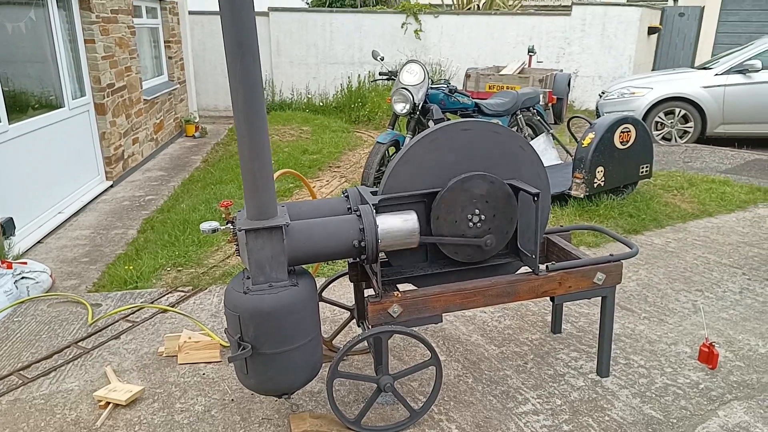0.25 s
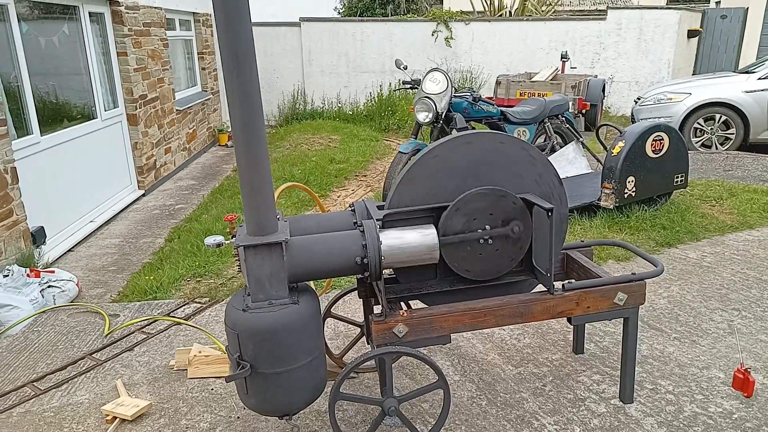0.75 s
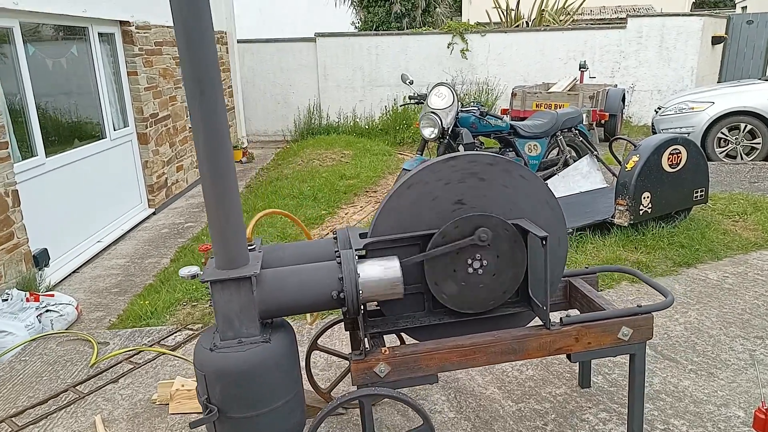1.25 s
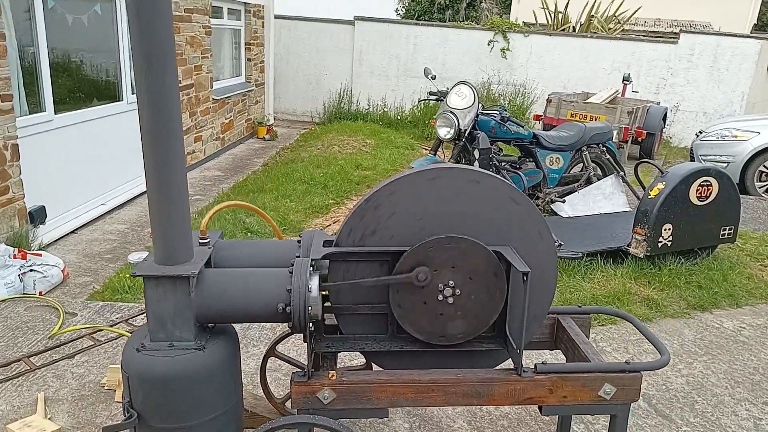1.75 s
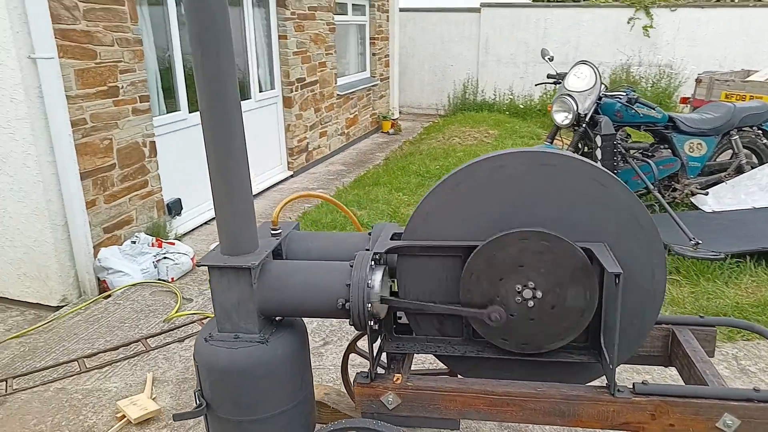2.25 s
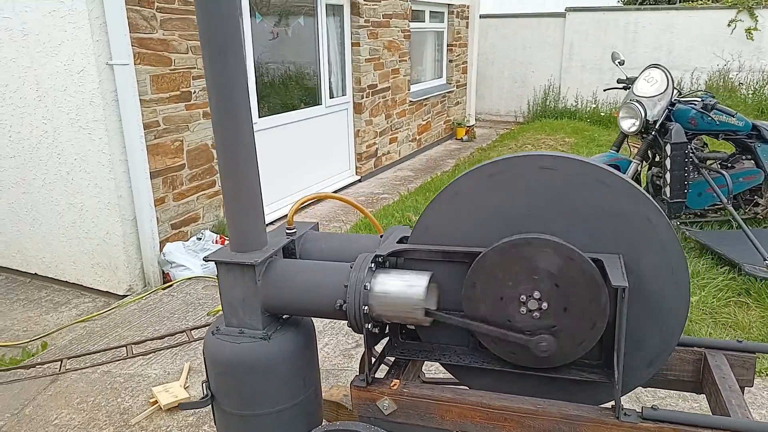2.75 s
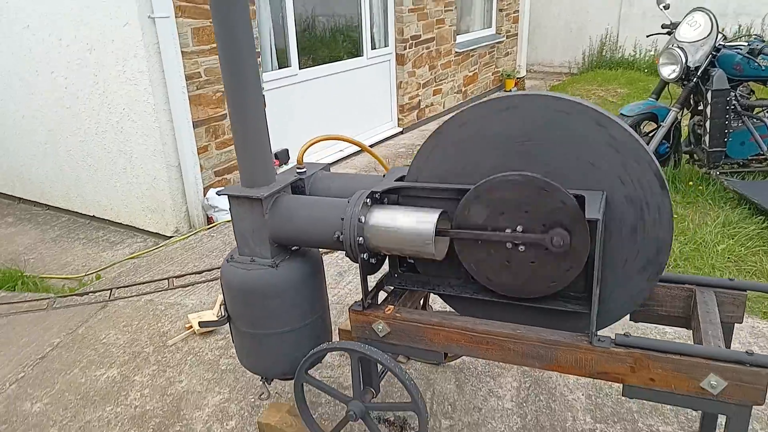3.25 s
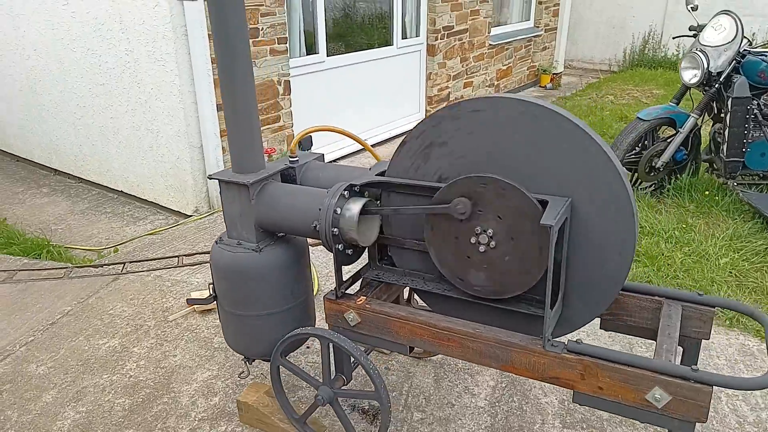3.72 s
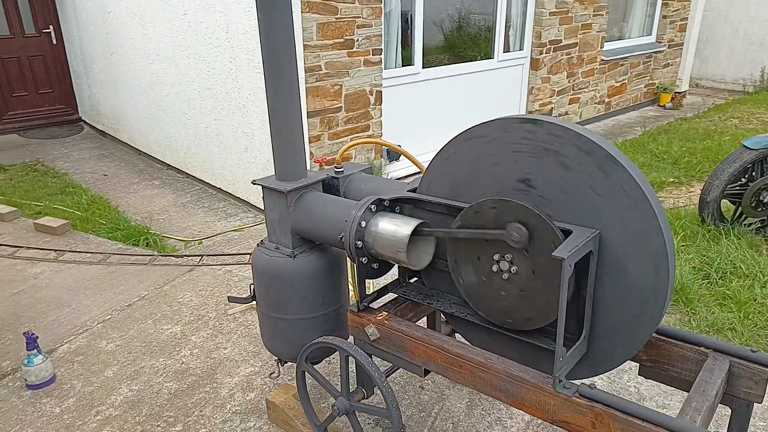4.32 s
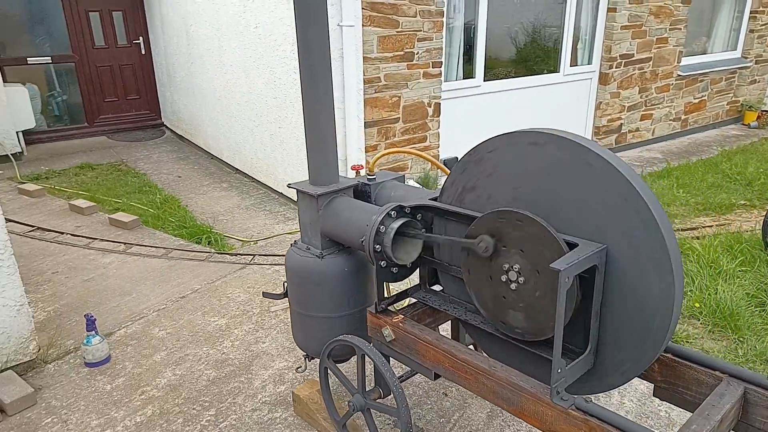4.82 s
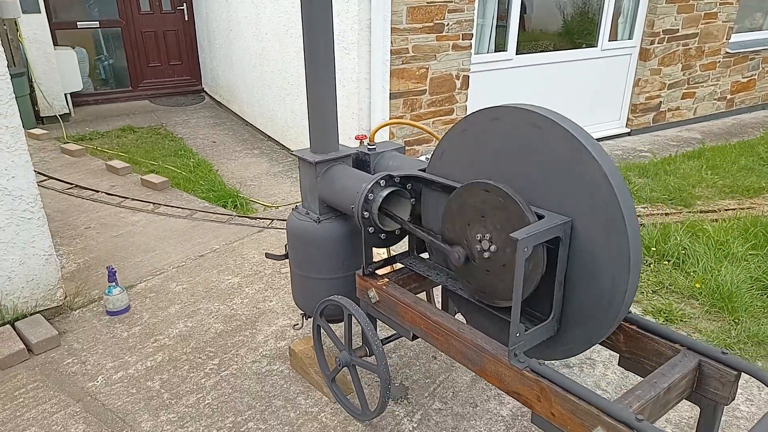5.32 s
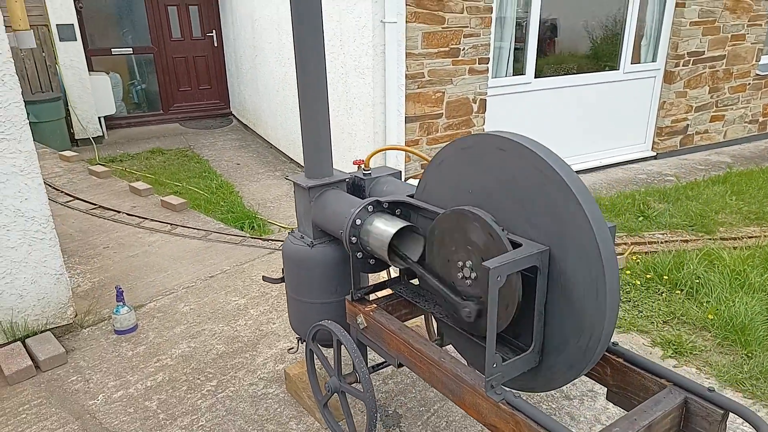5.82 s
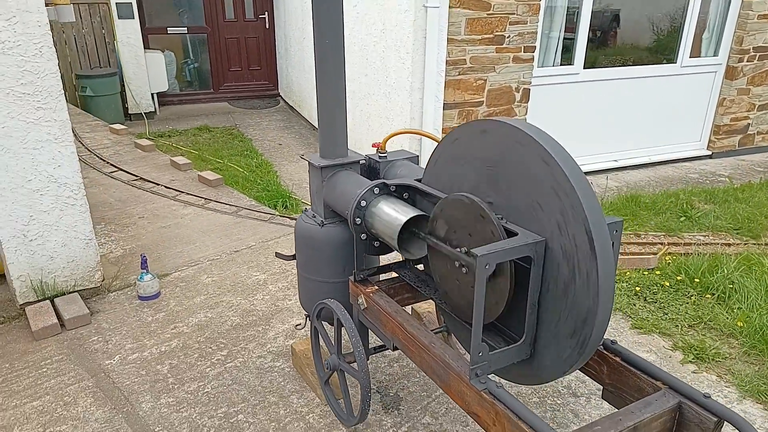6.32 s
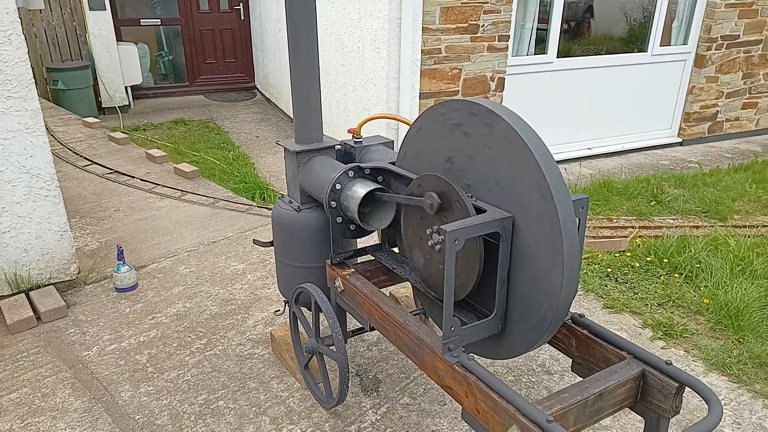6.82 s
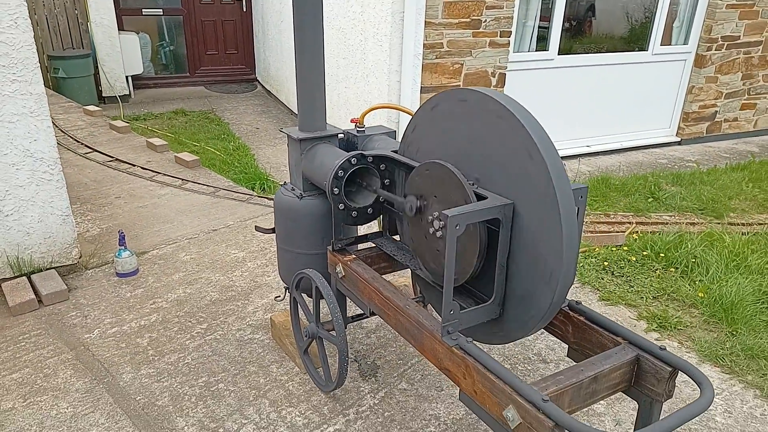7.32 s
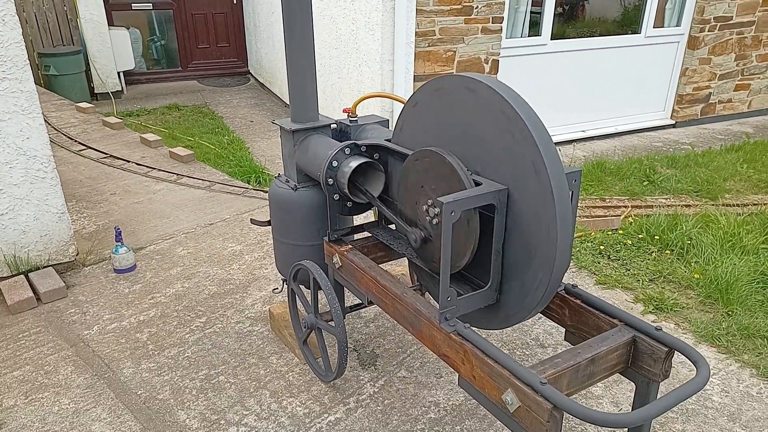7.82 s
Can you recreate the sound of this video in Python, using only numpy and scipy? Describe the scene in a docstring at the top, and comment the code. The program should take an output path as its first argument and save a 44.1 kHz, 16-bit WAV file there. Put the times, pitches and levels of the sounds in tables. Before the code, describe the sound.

A hot-air engine runs outdoors with a steady beat of soft thumps, ticks and sharp metal clacks over faint rubbing.

```python
"""First comes a soft thump, then a tick and a sharp clack, repeating about 3.6 times a second.
It is a home-built hot-air engine in a paved yard, heard from a microphone that circles it.
On each turn a quick run of knocks shakes the frame, a link ticks, the loose crank pin strikes
and bounces back, and sliding metal squeals faintly. The seals rub all the time, the walls
echo and wind stirs the microphone."""
import sys
import numpy as np
from scipy import signal
from scipy.fft import rfft, irfft, next_fast_len
from scipy.io import wavfile
from scipy.ndimage import uniform_filter1d, map_coordinates

SR = 44100
rng = np.random.default_rng(int(sys.argv[2]) if len(sys.argv) > 2 else 0)


def to_wav(sig):
    """Store sig (one row per channel, or 1-D mono) as 16-bit WAV at the path in sys.argv[1].

    Samples outside -1..1 are clipped; the rate is SR.
    """
    pcm = np.clip(np.atleast_2d(sig), -1, 1) * 32767
    pcm = np.round(pcm).astype(np.int16)
    wavfile.write(sys.argv[1], SR, pcm.T)  # frames by channels


N = 355446
SPAN, LEAD = 8192, 1323  # samples in one short sound, and how many come before its hit
T = (np.arange(SPAN) - LEAD) / SR
HZ = np.fft.rfftfreq(SPAN, 1 / SR)


def amp(db):
    return 10 ** (np.asarray(db) / 20)


def unit(x):
    return x / np.sqrt(np.mean(np.abs(x) ** 2) + 1e-20)


def bump(x, centre, width):
    return np.exp(-((x - centre) / width) ** 2)


def at_pitch(rows, hz):
    """Reads a table between its pitches, on a log scale."""
    pitches, values = np.transpose(rows)
    return np.interp(np.log(hz + 1), np.log(pitches + 1), values)


def at_time(rows, s):
    """Reads every column of a table at one moment."""
    times, *columns = np.transpose(rows)
    return np.array([np.interp(s, times, c) for c in columns])


def curve(rows):
    """One table value per sample."""
    return np.interp(np.arange(N) / SR, *np.transpose(rows))


def wobble(rate, size=N):
    """A smooth curve through `rate` random points a second."""
    points = rng.standard_normal(int(size * rate / SR) + 4)
    return map_coordinates(points, [np.arange(size) * rate / SR])


def burst(at, rise, fade):
    """Swells to 1 at a moment, then drops 60 dB in `fade` seconds."""
    return np.where(T < at, bump(T, at, rise), amp(-60 * np.maximum(T - at, 0) / fade))


def grit(envelope, rough_db):
    """A force made of many small, uneven touches."""
    return envelope * rng.standard_normal(SPAN) * unit(amp(rough_db * wobble(414.7, SPAN)))


def ring(force, notes, scatter_db):
    """A struck part rings at its own notes, their strengths scattered anew for each blow."""
    gains = amp(scatter_db * rng.standard_normal(len(notes)))
    body = sum((-1) ** k * gains[k] * amp(db) * 1j * HZ * width / (hz**2 - HZ**2 + 1j * HZ * width)
               for k, (hz, width, db) in enumerate(notes))
    # a part gives off little sound outside the range of its notes
    above, below = 1j * HZ / (0.93 * notes[-1][0]), 1j * HZ / (0.5 * notes[0][0])
    body *= below ** 2 / (1 + below + below ** 2) / (1 + above + above ** 2)
    return irfft(rfft(force) * unit(body), SPAN)


def level(x, db, seconds):
    """Sets the average level of the first moments after the hit."""
    return amp(db) * x / np.sqrt(np.mean(x[LEAD:LEAD + int(seconds * SR)] ** 2))


def add(track, s, x):
    """Lays a sound on the padded track."""
    track[SPAN + round(s * SR) - LEAD:][:SPAN] += x


def noise(tone, patchy_db):
    """Noise with a given tone and random louder and softer patches."""
    hz, _, bands = signal.stft(rng.standard_normal(N + 1024), SR, nperseg=1024)
    patches = uniform_filter1d(uniform_filter1d(rng.standard_normal(bands.shape), 5, 0), 5, 1)
    bands *= amp(patchy_db * unit(patches) + at_pitch(tone, hz)[:, None])
    return unit(signal.istft(bands, nperseg=1024)[1][:N])


# Notes that each part rings at; wider ones die sooner: (pitch [Hz], width [Hz], level [dB])
BOOM_NOTES = [(232.1, 17.5, -6), (292.1, 16.4, -9), (350.4, 56.6, -6), (370.7, 62, -9)]  # the frame's deep boom
LEG_NOTES = [(137, 8.3, 0)]
FRAME_NOTES = [(400, 54, -3), (481, 31, -2.5), (553, 28, 2), (612.5, 50, 2.5), (730, 150, -4.5)]
CRADLE_NOTES = [(888, 113, 4.6), (998, 35, 10.4), (1068, 205, 4.3)]
ROD_NOTES = [(1250, 25.5, 0.5), (1383, 109, -3.5), (1447.5, 59, 3.5)]
# The knocks in one thump: (delay [s], level [dB])
KNOCK_RUN = [(0, -4.5), (.009, 0.5), (.022, 4), (0.032, -9.5), (0.04, -17), (0.055, -22.5)]
# How the run is heard as the microphone moves: (time [s], first knock [dB], late knocks [dB])
KNOCK_BOOST = [(0, -1.5, 9), (1.8, -1, 10.5), (2.4, 8.5, 6), (4.2, 11, 6), (5.5, 1, 9), (8.06, 0.5, 15)]
# How loud the parts are in a thump: (time [s], boom [dB], frame [dB], cradle [dB], rod [dB])
THUMP_LEVELS = [(0, -45.5, -46.5, -69, -51.5), (0.8, -44.5, -57.5, -59.5, -52.5),
                (1.8, -41.5, -45.5, -62.5, -49), (2.6, -37, -39.5, -45.5, -45.5),
                (3.1, -40, -41.5, -56, -53.5), (4.1, -38, -44, -65, -59), (5, -39.5, -46, -53.5, -62),
                (6, -39.5, -49.5, -62, -57.5), (7.1, -40, -51, -60.5, -58.5), (7.8, -40.5, -49, -57, -57)]


def thumps(track):
    """Nearly the same run of soft knocks shakes the frame, legs, cradle and rod on every turn."""
    first_s, turn_s, slowing_s = -.0425, .27736, 6.63e-5
    turn = np.arange(30)
    for s in first_s + turn_s * turn + slowing_s * turn ** 2:
        first_db, late_db = at_time(KNOCK_BOOST, s)
        boom_db, *parts_db = at_time(THUMP_LEVELS, s)
        force = grit(.004 * burst(.02, .012, .12), rough_db=2.5)
        for delay, db in KNOCK_RUN:
            sample = LEAD + round((delay + rng.normal(0, .0004)) * SR)
            force[sample] += amp(db + rng.normal(0, 0.99))
        force[T < .005] *= amp(first_db)
        force[T > .027] *= amp(late_db)
        force = signal.lfilter(np.hanning(26), 1, force)  # padding softens the knocks
        sound = level(ring(force, BOOM_NOTES, scatter_db=1.5), boom_db, .06)
        sound += level(ring(force, LEG_NOTES, scatter_db=1.5), boom_db - 23.5, .06)
        # shaken through their mounts, these parts answer only near their own notes
        for notes, db in zip((FRAME_NOTES, CRADLE_NOTES[:1], ROD_NOTES[1:2]), parts_db):
            shaking = ring(force, notes, scatter_db=0)
            sound += level(ring(shaking, notes, scatter_db=1.5), db, .06)
        add(track, s, sound)


# The tone of the rub, murmur and hiss: (pitch [Hz], level [dB])
RUB_TONE = [(650, -46), (1100, -2.5), (1330, -3.5), (1820, -3), (2330, -3.5), (2580, -5), (3770, 0),
            (4410, -5.5), (5460, -17), (6530, -8.5), (7550, -31), (16000, -51)]
MURMUR_TONE = [(90, -27), (140, -7.5), (225, 0), (300, 2.5), (430, 1), (600, -3.5), (760, -6.5), (1000, -7),
               (1500, -46.5)]
HISS_TONE = [(5000, -38), (7500, 1), (9500, -2), (12500, -12), (15000, -2), (16000, -5)]
# How loud each is, before its dips: (time [s], level [dB])
RUB_LEVELS = [(0, -52), (1.2, -53.5), (2.5, -47.5), (3, -51), (4.6, -51.5), (5, -45), (5.3, -52.5),
              (6.3, -52.5), (7, -49), (8.06, -53)]
MURMUR_LEVELS = [(0, -58), (1.3, -53), (2.6, -54), (3.2, -51.5), (4.5, -55), (5.5, -56.5), (6.3, -56),
                 (8.06, -61)]
HISS_LEVELS = [(0, -84), (1.5, -86), (2.6, -69), (5, -72.5), (8.06, -73.5)]


def seals(clack_times):
    """The seals rub and hiss and the frame murmurs; all dip where the piston turns round."""
    starts = [clack_times[0] - .279, *clack_times, clack_times[-1] + .28]
    turn = np.interp(np.arange(N) / SR, starts, np.arange(len(starts))) % 1  # 0 to 1 between clacks
    rest, second_rest = bump(turn, .34, .062), bump(turn, .65, .23)
    rub_db = curve(RUB_LEVELS) - 8 * rest - 1.8 * second_rest
    rub = amp(rub_db + 1.25 * wobble(15)) * noise(RUB_TONE, patchy_db=7)
    murmur_db = curve(MURMUR_LEVELS) - 3.67 * rest - 2.2 * second_rest - 3.4 * bump(turn, .9, .044)
    murmur = amp(murmur_db + 4.68 * wobble(10)) * noise(MURMUR_TONE, patchy_db=4.5)
    hiss_db = curve(HISS_LEVELS) - 13.5 * bump(turn, .54, .14)
    hiss = amp(hiss_db + 1.7 * wobble(22)) * noise(HISS_TONE, patchy_db=0)
    return rub + murmur + hiss


# The wind's low rumble: (pitch [Hz], level [dB])
WIND_TONE = [(20, -25), (40, -32), (60, 1), (85, 14.5), (140, 13), (250, -67)]
# The light breeze: (time [s], level [dB])
BREEZE_LEVELS = [(0, -70), (1, -73), (2, -69.5), (4.5, -76), (5.8, -66), (6.3, -78), (7, -65), (7.4, -67),
                 (8.06, -51.5)]
# Single gusts: (loudest time [s], level [dB], swell time [s])
WIND_GUSTS = [(0.309, -63, .04), (2.107, -50, 0.021), (2.224, -43.5, 0.043), (2.366, -56, .03),
              (2.786, -60, 0.031), (3.076, -53, 0.048), (3.617, -65, .03), (4.186, -46, .035),
              (5.049, -61, 0.033), (5.723, -64, 0.026), (5.858, -62, .03), (6.721, -63, 0.036),
              (6.927, -58.5, 0.15)]


def wind():
    """Short gusts and a light breeze rumble on the microphone."""
    rumble = noise(WIND_TONE, patchy_db=9)
    even_rumble = rumble / np.sqrt(np.abs(uniform_filter1d(rumble ** 2, size=SR // 16)) + 0.14)
    t = np.arange(N) / SR
    gusts = sum(amp(db) * bump(t, s, swell) for s, db, swell in WIND_GUSTS)
    breeze = amp(curve(BREEZE_LEVELS) + 3.5 * wobble(6.8))
    return (gusts + breeze) * amp(0.6 * wobble(12)) * even_rumble


# Higher ringing notes: (pitch [Hz], width [Hz], level [dB])
LINK_NOTES = [(2730, 220, -15.5), (3166, 18, -7), (3710, 23, -16), (3783, 93, 5), (4085, 80, -2.5),
              (4400, 60, -1), (4707, 110, -5.5), (4674, 164, -9)]
DISC_NOTES = [(1962, 48, -10), (2093, 34, -8.5), (2180, 120, -6.5), (2307, 52, 2.5), (2477, 54, -7.5)]
COLLAR_NOTES = [(5390, 84, -4), (6110, 100, 3.5), (6450, 74, 7), (6786, 220, 3.5), (7120, 56, -6.5),
                (7540, 110, -4)]
SIZZLE_NOTES = [(7900, 230, -7), (8430, 370, 21), (8440, 340, 27), (9120, 400, 21), (9670, 360, 11),
                (10170, 270, 7)]  # bright ring of the small parts
# very high fizz on each tick and clack, coloured by the microphone's resonance near 15 kHz
FIZZ_NOTES = [(10900, 730, -15.5), (12400, 890, -11.5), (14540, 900, -11), (14900, 600, 2.5)]
COLLAR_FOLLOWS = 0.52  # share of the sizzle level added to the collar's
# How loud the parts are in a tick: (time [s], rod [dB], collar before that share [dB])
TICK_LEVELS = [(0, -53, -29.5), (1.6, -54.5, -13.5), (2.8, -55, -34), (4.4, -59.5, -27), (6.2, -50.5, -38),
               (8, -51, -28)]
# Each hit of the link: (time [s], blow [dB], chatter [dB], sizzle [dB])
LINK_HITS = [(0.043, -29.5, -59, -58.5), (0.319, -30.5, -42, -53.5), (0.597, -33, -42.5, -61.5),
             (0.872, -37, -39, -66), (1.15, -37.5, -36.5, -69), (1.431, -37, -43, -71),
             (1.708, -31, -42, -56.5), (1.987, -35, -48, -57), (2.264, -31.5, -42, -51.5),
             (2.548, -31, -35, -48), (2.825, -32.5, -50, -57), (3.101, -32.5, -64, -75),
             (3.381, -40.5, -50, -62.5), (3.659, -35, -40, -57.5), (3.938, -34, -40, -79),
             (4.217, -52, -40, -75), (4.497, -36, -44, -73), (4.778, -45, -55, -68),
             (5.063, -34.5, -38, -54), (5.336, -63, -42, -77), (5.619, -37, -41.5, -60.5),
             (5.897, -35.5, -43.5, -53), (6.187, -40, -42, -55.5), (6.46, -37, -49, -69),
             (6.741, -34.5, -43.5, -54), (7.022, -40.5, -45.5, -65), (7.304, -39, -46, -60),
             (7.585, -41, -57, -66), (7.866, -38.5, -44.5, -63)]


def link_ticks(track):
    """The link hits suddenly and buzzes on, setting other parts ringing."""
    for s, blow_db, chatter_db, sizzle_db in LINK_HITS:
        rod_db, collar_db = at_time(TICK_LEVELS, s)
        blow = amp(blow_db) * burst(0.0015, 0.0026, 0.13)
        chatter = amp(chatter_db) * burst(0.019, 0.017, 0.28) * burst(0.057, 0.89, 0.23)
        sound = ring(grit(blow + chatter, rough_db=3), LINK_NOTES, scatter_db=2)
        heavy = grit(5.4 * blow + chatter, rough_db=-3)
        sound += level(ring(heavy, ROD_NOTES[2:] + DISC_NOTES[3:], scatter_db=9), rod_db, 0.056)
        snap = amp(blow_db) * burst(.001, .0006, .05)  # the small parts answer at once
        light = grit(snap + 0.3 * chatter, rough_db=3)
        highs_db = collar_db + COLLAR_FOLLOWS * sizzle_db, sizzle_db, -55 + .4 * sizzle_db
        for notes, db in zip((COLLAR_NOTES, SIZZLE_NOTES, FIZZ_NOTES), highs_db):
            sound += level(ring(light, notes, scatter_db=5), db, .02)
        add(track, s, sound)


# Ringing notes of the crank pin and piston: (pitch [Hz], width [Hz], level [dB])
PIN_NOTES = [(2739, 68, -11), (2982, 34, -6.5), (3195, 190, -9), (3583, 32.5, -1), (3841, 52, -1.5),
             (4067, 140, -5), (4320, 95, -2.5), (4527, 87, -6.5), (4607, 106, -3.5), (5020, 26, -12.5)]
PISTON_NOTES = [(1588, 75, 0.5), (1696, 105, 2.5), (1740, 340, -1)]
# The heavy parts in a clack: (time [s], frame [dB], cradle [dB], rod [dB], piston [dB], disc [dB])
CLACK_LEVELS = [(0.1, -56, -51, -40.5, -43.5, -48), (0.8, -50.5, -64, -33.5, -65, -41.5),
                (1.6, -47.5, -65, -45, -55, -48), (2.7, -47.5, -47, -38.5, -48, -41),
                (3.4, -51, -47, -44, -61, -43), (4.5, -49.5, -48.5, -43, -38, -45.5),
                (5.4, -45.5, -36, -45.5, -42, -40), (6.6, -48, -49.5, -46.5, -37.5, -38.5),
                (8, -43.5, -46, -47.5, -41, -45.5)]
# The collar in a clack, before its share of the sizzle: (time [s], level [dB])
COLLAR_LEVELS = [(0, -24.5), (1.2, -14.5), (2.2, -20.5), (2.7, -20), (8, -17)]
# Each hit of the pin:
# (time [s], slide [dB], blow [dB], chatter [dB], bounce delay [s], bounce [dB], sizzle [dB])
PIN_HITS = [(0.136, -50, -21.5, -40.5, 0.033, -35.5, -69), (0.415, -44, -21.5, -46, 0.031, -36.5, -68.5),
            (0.693, -43, -19, -36, 0.033, -37, -69.5), (0.977, -22, -26.5, -43, 0.032, -37.5, -78.5),
            (1.248, -51, -15, -33.5, 0.039, -41, -64.5), (1.528, -43, -16.5, -36.5, 0.038, -37.5, -63.5),
            (1.805, -50, -18, -37, 0.035, -33.5, -62.5), (2.082, -35, -22, -39, 0.034, -30.5, -61),
            (2.36, -37.5, -18, -34, 0.033, -31, -54.5), (2.642, -32, -22.5, -51, 0.025, -29, -51.5),
            (2.919, -35, -21, -45, 0.031, -26.5, -54), (3.199, -33, -21, -44, 0.03, -31, -54.5),
            (3.477, -32, -18.5, -39, 0.031, -29, -55.5), (3.757, -36, -24.5, -38.5, 0.034, -32.5, -57.5),
            (4.04, -30.5, -33.5, -64, 0.022, -31, -56.5), (4.323, -33.5, -26.5, -34, 0.03, -35, -58),
            (4.591, -38.5, -23, -36.5, 0.039, -33, -56), (4.873, -33.5, -21.5, -46, 0.028, -26, -60),
            (5.154, -31.5, -20.5, -36.5, 0.033, -31.5, -56), (5.436, -31, -21.5, -35, 0.031, -33.5, -58.5),
            (5.716, -35, -30, -53, 0.022, -29, -57.5), (5.992, -37, -24.5, -39, 0.035, -32.5, -57),
            (6.273, -35, -22, -32.5, 0.033, -30.5, -55), (6.554, -33.5, -20, -33, 0.031, -30.5, -57.5),
            (6.835, -32, -26, -67, 0.027, -27, -58.5), (7.116, -38.5, -23.5, -37, 0.03, -33.5, -61),
            (7.397, -30, -27, -38.5, 0.033, -29.5, -56.5), (7.677, -33.5, -22.5, -36, 0.031, -27.5, -59),
            (7.957, -36.5, -28, -50, 0.03, -30.5, -59)]


def pin_clacks(track):
    """The loose pin slides across its gap, strikes, chatters, bounces and is pressed quiet."""
    heavy_parts = FRAME_NOTES, CRADLE_NOTES, ROD_NOTES, PISTON_NOTES, DISC_NOTES
    for s, slide_db, blow_db, chatter_db, delay, bounce_db, sizzle_db in PIN_HITS:
        parts_db = at_time(CLACK_LEVELS, s) + 3 * rng.standard_normal(5)  # no two turns are alike
        slide = amp(slide_db - 3) * burst(-.008, .009, .05)
        blow = amp(blow_db - 7) * burst(0, 0.0054, 0.051)
        strike = amp(blow_db + 13) * (T == 0)
        bounce = amp(bounce_db) * burst(delay, 0.0086, 0.069)
        chatter = amp(chatter_db) * burst(0.013, 0.0027, 0.15) * burst(delay + 0.014, 0.92, 0.042)
        force = strike + grit(slide + blow + chatter + bounce, rough_db=-1.5)
        sound = ring(force, PIN_NOTES, scatter_db=6)
        # the heavy parts mostly feel the blow, the light ones the sliding
        heavy = 1.15 * strike + grit(0.99 * blow + chatter + 0.19 * bounce, rough_db=1.5)
        heavy += grit(.25 * slide, rough_db=2.5)
        light = grit(3.4 * slide + 0.67 * blow + 0.35 * chatter + 0.88 * bounce, rough_db=3)
        for notes, db in zip(heavy_parts, parts_db):
            sound += level(ring(heavy, notes, scatter_db=5), db, .047)
        sound += level(ring(heavy, BOOM_NOTES[1:], scatter_db=3), parts_db[0] - 10, .047)
        collar_db = at_time(COLLAR_LEVELS, s)[0] + COLLAR_FOLLOWS * sizzle_db
        for notes, db in (COLLAR_NOTES, collar_db), (SIZZLE_NOTES, sizzle_db):
            sound += level(ring(light, notes, scatter_db=4), db, .04)
        # a fine fizz lasts from the slide to the bounce and flares at both
        fizz = 0.54 * burst(-0.0044, 0.0067, 0.21) * burst(delay + 0.0061, 1, 0.075)
        fizz += 1.1 * burst(-.006, .006, 0.051) + burst(delay, .006, 0.053)
        sound += amp(sizzle_db + 0.5) * ring(grit(fizz, rough_db=2.5), FIZZ_NOTES, scatter_db=0.5)
        add(track, s, sound)


# The four notes of sliding metal: (pitch [Hz], width [Hz], loudest time after the clack [s])
SQUEAL_NOTES = [(2413, 48, 0.12), (4434, 70, 0.058), (5970, 25, 0.075), (2876, 27, 0.14)]
# Their relative levels: (time [s], first [dB], second [dB], third [dB], fourth [dB])
SQUEAL_LEVELS = [(0, -71, -68, -79, -86), (1.6, -65, -54, -75, -80), (2.5, -60, -56.5, -57, -73),
                 (3.6, -60, -52, -63, -59), (4.3, -62.5, -55, -55.5, -81), (4.9, -64.5, -59, -66, -72),
                 (5.2, -70, -51, -95, -72), (6.8, -65.5, -56.5, -75, -71), (8.06, -64, -50, -73, -70)]


def squeals(track, clack_times):
    """Between clacks, sliding metal sings a few thin, wavering notes."""
    for s in clack_times:
        for (hz, width, delay), db in zip(SQUEAL_NOTES, at_time(SQUEAL_LEVELS, s)):
            stroke = burst(delay + rng.normal(0, 0.022), 0.031, 0.16)
            rubbing = rng.standard_normal(SPAN)
            note = ring(rubbing, [(hz * (1 + rng.normal(0, 0.0037)), width, 0)], scatter_db=0)
            add(track, s, amp(db + 11.5 + rng.normal(0, 2.5)) * stroke * note)


# How long the yard echoes: (pitch [Hz], time to fade by 60 dB [s])
ECHO_TIMES = [(200, 0.56), (2000, 0.074), (10000, 0.48)]


def yard_echo(x):
    """The walls throw the sound back, and each pitch fades at its own speed."""
    hz, t, bands = signal.stft(rng.standard_normal(SR // 2), SR, nperseg=256)
    fade = amp(-60 * t / at_pitch(ECHO_TIMES, hz)[:, None])
    tail = signal.istft(bands * fade, SR, nperseg=256)[1]
    delayed = np.pad(x, (600, 0))
    return signal.fftconvolve(delayed, tail / np.linalg.norm(tail))[:len(x)]


def scene():
    """Mixes the engine, its echo and the wind into one channel."""
    track = np.zeros(N + 2 * SPAN)
    clack_times = np.transpose(PIN_HITS)[0]
    pin_clacks(track)
    link_ticks(track)
    thumps(track)
    squeals(track, clack_times)
    engine = (track + amp(-24.5) * yard_echo(track))[SPAN:SPAN + N]
    return (engine + seals(clack_times) + wind())[None]


def record(dry):
    """Cuts away the very highest treble."""
    top_hz = 15900
    size = next_fast_len(N + SPAN)
    kept = np.fft.rfftfreq(size, 1 / SR) < top_hz
    return irfft(rfft(dry, size) * kept, size)[:, :N]


dry = scene()
out = record(dry)
to_wav(out)
```